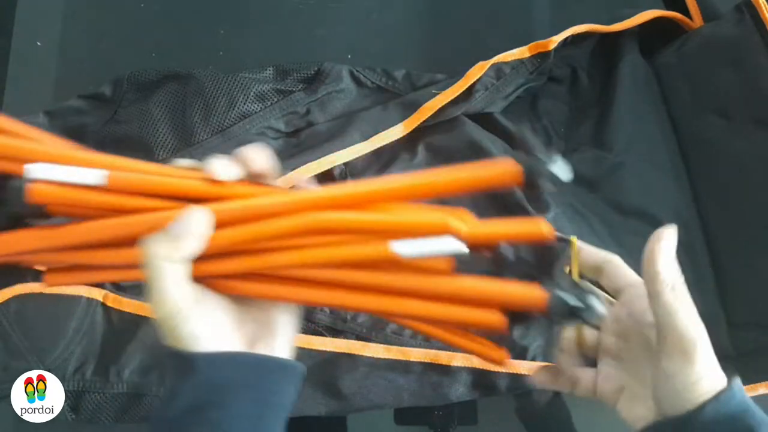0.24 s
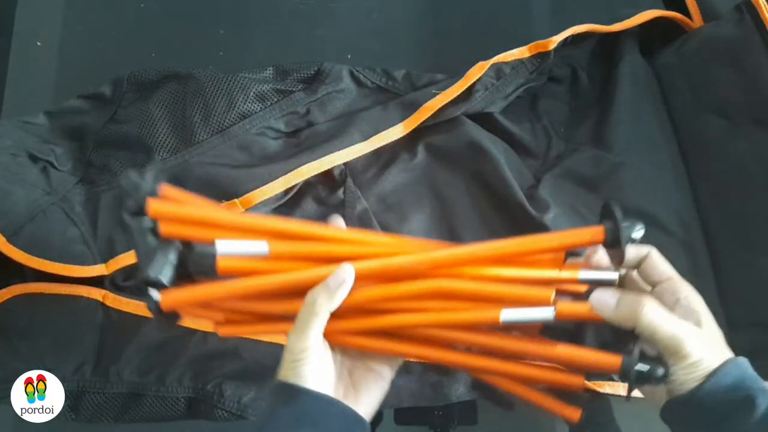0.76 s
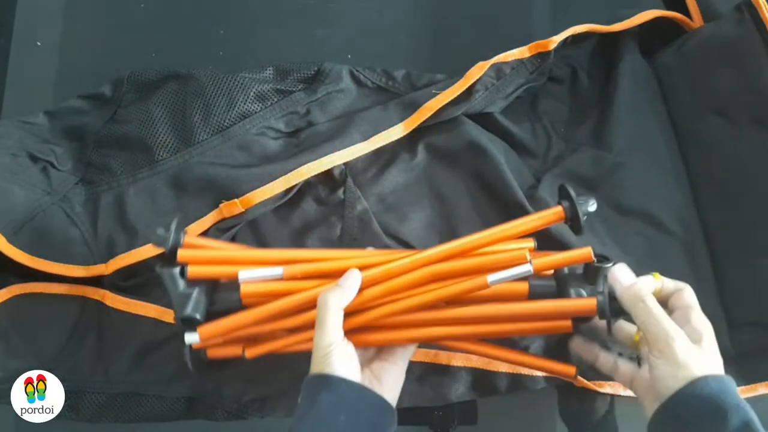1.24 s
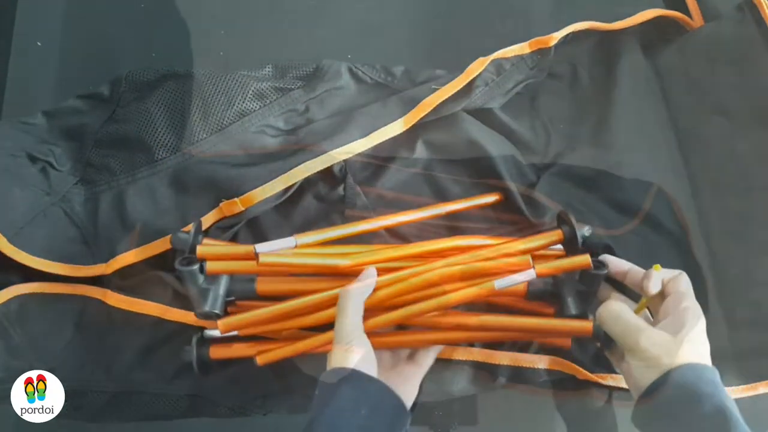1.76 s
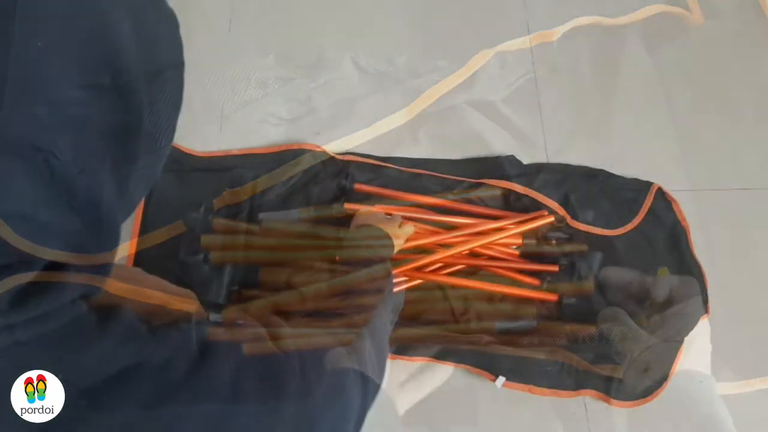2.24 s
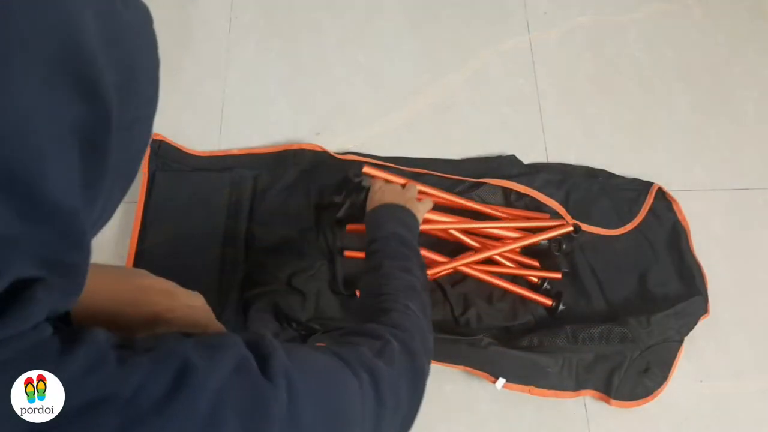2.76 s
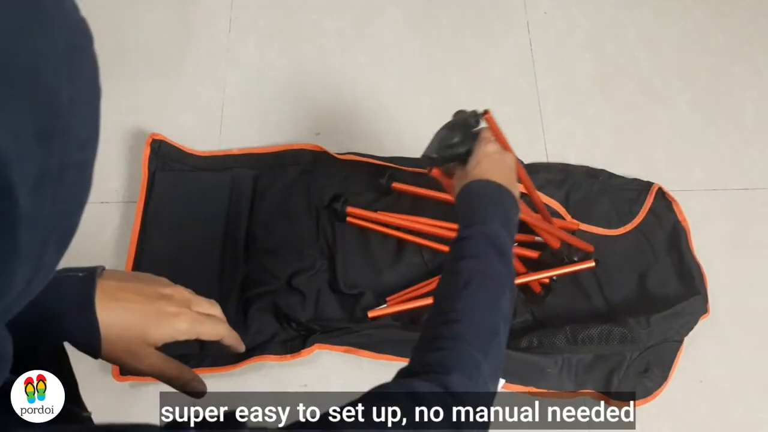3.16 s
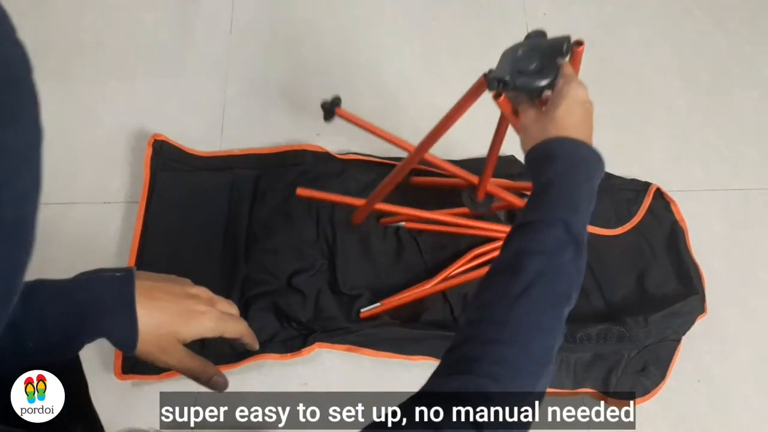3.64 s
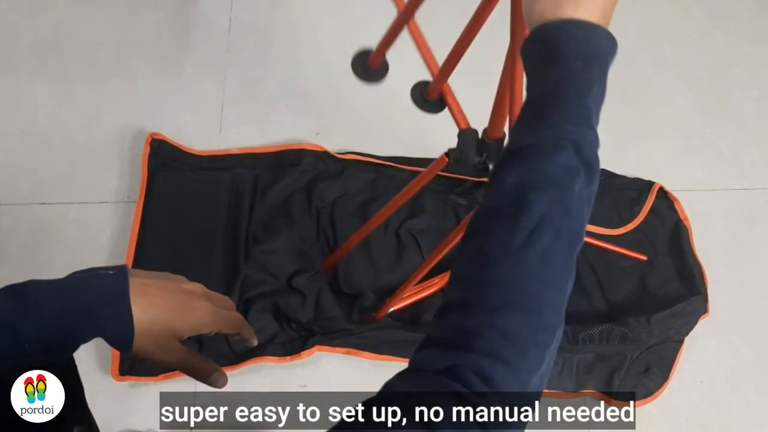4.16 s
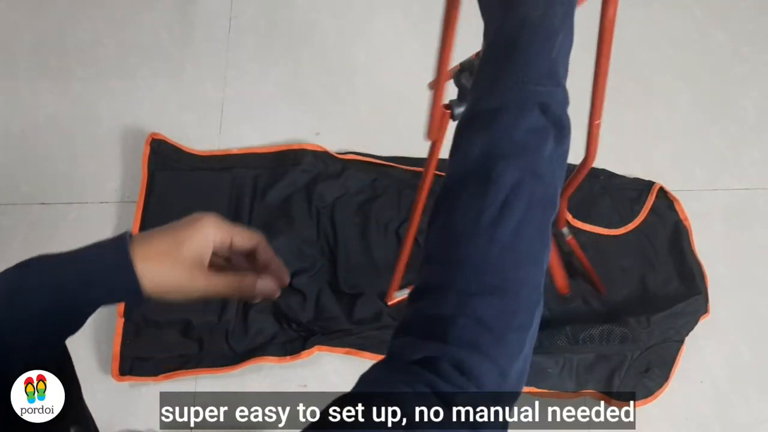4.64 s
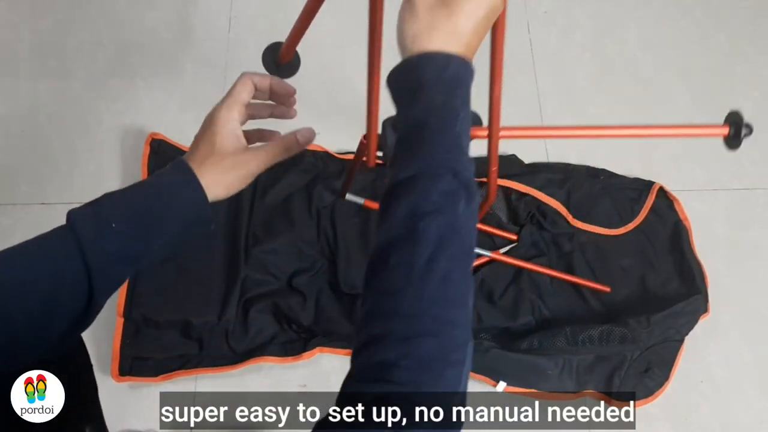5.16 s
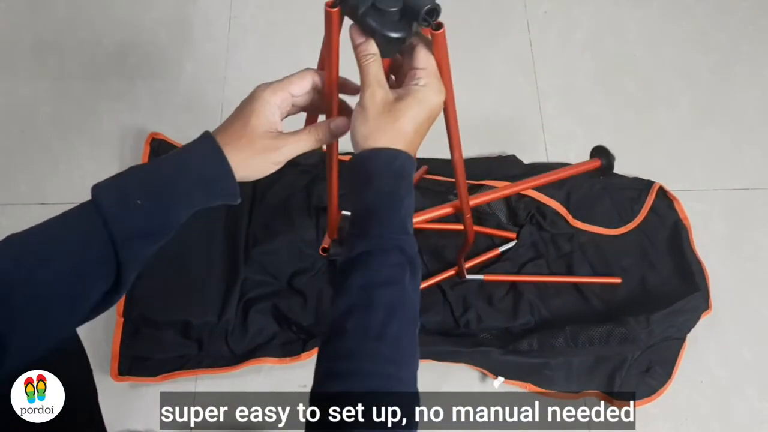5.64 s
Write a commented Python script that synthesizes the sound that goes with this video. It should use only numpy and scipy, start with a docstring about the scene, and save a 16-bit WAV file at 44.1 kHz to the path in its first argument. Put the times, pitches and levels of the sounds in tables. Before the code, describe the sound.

A bundle of thin metal tent-style poles clacks and clinks sharply in the hands over rustling nylon in a bare, bright tiled room.

```python
"""Hands shift a bundle of thin aluminium chair poles over a nylon seat in a bare, tiled room, a phone close above.
Faint clacks come first over hum and hiss; then the nylon rustles and a pole slides on another.
Poles clack harder on each other and on plastic hubs: noise cracks with a knock, then damped tube modes ring.
Midway the bundle thuds down on low room modes and tubes and hubs tock hollowly; late comes a bright, ringing cluster.
A few lighter clacks and creases end it; decaying noise gives the room's bright half-second tail throughout."""
import sys
import numpy as np
from scipy import signal
from scipy.fft import rfft, irfft, next_fast_len
from scipy.io import wavfile
from scipy.ndimage import map_coordinates

SR = 44100
rng = np.random.default_rng(int(sys.argv[2]) if len(sys.argv) > 2 else 0)


def unload_wav(signal):
    """Save mono or channel-first audio to the path in sys.argv[1] as 16-bit WAV at rate SR, clipped to [-1, 1]."""
    wavfile.write(
        sys.argv[1],
        SR,
        np.round(np.clip(np.atleast_2d(signal).T, -1, 1) * 32767).astype(np.int16),
    )


N = 260631

# poles hitting poles and hubs: start_s, crack_peak_db, knock_hz, body_db, treble_db, tube_ring_db, contact_ms
POLE_CLACKS = [ (.172, -53.5, 2500, -5, -19, -21.5, 2.7), (0.42, -50, 2430, -9.5, -8, -25, 4.1),
               (.69, -41, 2080, 3, -38, -19, 3.4), (0.715, -45, 2030, -11, -26, -33, 1.6),
               (.78, -28, 2100, -18, -16, -23.5, 6.2), (.822, -30, 2030, 5, -38, -32, 1.7),
               (.867, -33.5, 2360, 2, -49, -28, 1.9), (.918, -15.5, 1484, -8.5, -12, -48, 2.27),
               (1.053, -31, 2960, -9, -29, -39, 2.3), (1.083, -15, 5630, -7, -12.5, -19, 3.2),
               (1.168, -25.5, 2360, -1.5, -46, -27, 2.1), (1.255, -24.5, 3350, -12, -19, -53, 1.6),
               (1.411, -36, 2350, -7, -29, -25, 4.1), (1.468, -33, 2350, 1, -17, -30, 3.8),
               (1.49, -28.5, 3160, -4, -12, -20, 4.9), (1.532, -25, 3780, -20, -35, -23, 6.2),
               (1.589, -9, 4060, -28, -8, -23, 4), (1.811, -20, 7100, 1, -15, -37, 4.1),
               (1.818, -19, 7130, -2.5, -25, -20, 3), (1.91, -19, 3750, -7, -27, -18.5, 1.4),
               (1.961, -16.5, 3020, -4.5, -13, -24.5, 3.9), (2.025, -23, 7140, -3, -12, -34, 2.6),
               (2.031, -6.5, 7130, -7.5, -3.5, -32.5, 3.3), (2.107, -13, 2850, -3.5, -8.5, -26, 2.4),
               (2.227, -14.5, 4000, -10.5, -10.5, -26.5, 1.6), (2.28, -18.5, 1340, 11.5, -7, -45, 0.85),
               (2.549, -31.5, 7420, -17, -1, -19.5, 3.1), (2.575, -8.5, 11800, -2, -4.5, -23.5, 2.15),
               (2.652, -22, 3310, -5.5, -21, -20.5, 3.1), (2.731, -21, 2230, -15, -20, -29, 3.9),
               (2.745, -17.5, 4910, -18, -8.5, -17.5, 3.2), (3.109, -27.5, 3326, -10, -47, -22, 5),
               (3.125, -28.5, 2340, -5, -23, -41, 8.1), (3.205, -13, 3364, -5, -6.5, -21.5, 1.56),
               (3.292, -23.5, 2630, -6, -54, -30, 1.5), (3.436, -27.5, 1810, -0.5, -24, -29, 6),
               (3.653, -20.5, 1630, 7, -22.5, -28, 4.4), (3.861, -10, 1927, 4, -7.5, -41, 2.7),
               (4.09, -25, 3690, -10, -9, -22, 6.6), (4.462, -28, 7200, -16, -22.5, -29, 4.9),
               (4.468, -18, 7160, -19, -8.5, -26, 9.3), (4.477, -23, 4100, 2, 3, -39, 5.5),
               (4.626, -28, 7160, -9, -0.5, -20, 14.3), (4.65, -10.5, 5020, -21.5, 1, -15, 8.6),
               (4.662, -20, 5550, -20, 3, -21.5, 1.6), (4.672, -16.5, 5300, -22, 15, -24.5, 5.4),
               (4.682, -16, 5060, -27, 2, -18, 7.2), (5.119, -48.5, 2160, 3, -10.5, -21.5, 2.5),
               (5.22, -31, 2200, -2, -53, -28, 3.1), (5.437, -24.5, 4300, 0, -5, -27, 3.9),
               (5.554, -37.5, 2900, 9, -8, -23.5, 5.9), (5.592, -35.5, 2950, 2, -9.5, -26, 3),
               (5.753, -35, 1590, 1.5, -18.5, -40, 6)]
# wall modes of a tube, before each blow's own scaling: pitch_hz, level_db, t60_s
TUBE_MODES = [(3036, -11, .1), (3833, -9, .05), (5040, -7, .07), (5120, -7, .07), (5218, -7, .08),
              (7154, -5, .06), (7312, 1, .13), (7625, -8, .06), (8233, -6, .06), (9903, -8, .06),
              (10050, -8, .05), (12610, -8, .05), (12690, -8, .06)]
# hollow tocks of tubes and hubs: start_s, level_db, pitch_hz
HOLLOW_TOCKS = [(1.711, -27, 1000), (2.035, -26, 700), (2.107, -26, 560), (2.581, -23, 1320),
                (2.59, -29, 873), (3.657, -38, 243), (3.872, -38, 253), (4.256, -40, 698),
                (5.122, -51, 684), (5.479, -33, 896), (5.564, -55, 330), (5.6, -46, 432),
                (5.628, -45.5, 288)]
# a pole sliding along another: start_s, end_s, level_db, pitch_hz, width (share of the pitch)
POLE_SLIDES = [(0.62, 0.74, -61.5, 2100, 0.083), (1.369, 1.628, -49.5, 820, 0.47),
               (2.761, 3.027, -44, 3260, 0.081), (3.702, 3.899, -49, 1430, 0.15),
               (3.954, 3.994, -39.5, 1064, 0.04), (4.12, 4.228, -55, 850, 0.17),
               (5.29, 5.418, -51.5, 760, 0.63)]
# nylon dragged and creased: time_s, level_db, tilt_db_per_octave
NYLON_MOVES = [(.55, -82, 0.5), (.72, -56.5, 1), (.78, -49.5, -2.5), (.89, -74, -4), (1.03, -69, -5.5),
               (1.36, -78, -9.5), (1.43, -61, -5.5), (1.53, -37, 1), (1.68, -41, -5.5), (1.8, -46, -3),
               (2.3, -45.5, -2.5), (2.48, -47, -2.5), (2.78, -41, 0.5), (2.95, -41, 0.5), (3.08, -48.5, -2),
               (3.2, -45.5, -1.5), (3.63, -56, -2), (3.8, -50.5, -0.5), (4.19, -54, -2.5),
               (4.31, -94.5, -11.5), (5.05, -85, -8.5), (5.28, -61, -1), (5.36, -52, 1.5),
               (5.48, -60.5, -5), (5.62, -64.5, -4), (5.72, -77.5, -8), (5.91, -84, -8.5)]
# spectrum of the nylon: pitch_hz, density_db (per Hz)
NYLON_SPECTRUM = [(60, -31), (150, -14), (400, -0.5), (1000, 6), (2200, 8.5), (3500, 6.5), (5500, 0),
                  (7500, 5.5), (9500, -3), (15000, -8.5)]
# bundle and hubs landing softly: start_s, peak_db
SOFT_THUDS = [(1.617, -41), (1.687, -38), (1.76, -37), (1.918, -38), (2.04, -43.5), (2.282, -31.5),
              (2.331, -36), (2.431, -45), (2.577, -37.5)]
# low room modes set going by the thuds: pitch_hz, level_db, t60_s
LOW_ROOM_MODES = [(66.2, -5, 0.072), (128, -3, 0.1), (186, -5.5, 0.06), (253.6, -1, 0.092), (345, 2, 0.052)]
# where the hands are: time_s, left_lag_ms (behind right), pan_db (left minus right)
HAND_PLACE = [(0.2, -0.059, 5), (1.2, -0.028, 2.5), (2.2, -0.036, 2.5), (3, 0.037, 2.2), (3.7, 0.036, 2.5),
              (4.5, 0.16, 1.5), (5.2, 0.041, 2)]
# decay of the room's tail: pitch_hz, t60_s
TAIL_T60 = [(60, 0.068), (200, 0.53), (600, 0.26), (1500, 0.47), (4000, 0.4), (10000, 0.44), (16000, 0.29)]
# colour of the room's tail: pitch_hz, level_db
TAIL_COLOUR = [(60, -23.5), (300, 0), (2000, -1.5), (8000, -3), (16000, 0)]
# how alike left and right are in the room: pitch_hz, correlation (0 to 1)
STEREO_LIKENESS = [(100, 0.6), (300, 0.79), (600, 0.25), (1200, 0.082), (16000, .02)]
# spectrum of the hiss: pitch_hz, density_db (per Hz)
HISS_SPECTRUM = [(80, -14.5), (120, 5.5), (160, -13.5), (249, 0), (343, -8), (818, -16), (2800, -32),
                 (3620, -41.5), (5080, -34.5), (6420, -8.5), (9210, -33), (16000, -42.5)]
# spectrum of the low hum: pitch_hz, density_db (per Hz)
HUM_SPECTRUM = [(20, -28.5), (45, -3), (69, -5.5), (78, 6), (88, -3), (130, -30.5)]
# background over time: time_s, hiss_db, hum_db (middle of left and right)
BACKGROUND_LEVEL = [(0, -69, -71.5), (1.2, -64.5, -68), (1.6, -121, -68), (2.8, -77.5, -69),
                    (4.4, -69, -80), (5.9, -97.5, -79)]

ROOM_SHARE_DB, SHARE_DB_PER_MS = -15.5, 0.4  # longer contacts send more to the room
THIN_HZ = 340  # a slender pole moves little air below this
KNOCK_GAIN, KNOCK_WIDTH = 1.7, 0.072  # height of the knock over the crack, width as a share of its pitch
UNEVEN_DB, UNEVEN_HZ = 3., 400.  # each contact has its own peaks and dips: depth, spacing
RATTLES, RATTLE_HZ, RATTLE_MS = 150, 2546, 0.8  # count, middle pitch, contact time
RATTLE_DB, RATTLE_SPREAD_DB = 10.5, 3.5  # over the cloth level, spread
PATCHY_DB, PATCHES_PER_S = 3, 20.  # how unevenly the folds colour the rustle
TOP_HZ = 15700  # upper limit of the phone


def undb(db):
    """Turns dB into a gain."""
    return 10 ** (np.asarray(db) / 20)


def unit(x):
    """Scales to an RMS of one."""
    return x / np.sqrt(np.mean(x ** 2))


def on_log(table, hz):
    """Reads a (Hz, value) table on a log-frequency axis."""
    f, v = np.transpose(table)
    return np.interp(np.log(np.maximum(hz, 1)), np.log(f), v)


def curves(table):
    """Draws straight lines between the rows of a timed table, one curve a column."""
    s, *columns = np.transpose(table)
    return [np.interp(np.arange(N) / SR, s, c) for c in columns]


def colour(x, gain):
    """Filters by a gain given as a function of Hz."""
    n = next_fast_len(x.shape[-1])
    return irfft(rfft(x, n) * gain(np.fft.rfftfreq(n, 1 / SR)), n)[..., :x.shape[-1]]


def ring(modes, length, spread_db, detune):
    """Damped sines; each blow weights and bends them a little differently."""
    hz, db, t60 = np.transpose(modes)[:, :, None]
    bend, weight = rng.standard_normal((2, len(modes), 1))
    t = np.arange(length) / SR
    waves = np.sin(2 * np.pi * hz * (1 + detune * bend) * t)
    waves = waves * np.exp(-np.log(1000) * t / t60)
    return np.sum(undb(db + spread_db * weight) * waves, axis=0)


def add(out, x, s):
    """Lays a sound into the track at s seconds."""
    i = int(s * SR)
    out[i:i + len(x)] += x[:N - i]


def pair(size, likeness):
    """Two noises whose likeness depends on frequency."""
    mid, side = rng.standard_normal((2, size))
    alike = lambda hz: np.clip(on_log(likeness, hz), 0, 1)
    mid = colour(mid, lambda hz: np.sqrt(1 + alike(hz)))
    side = colour(side, lambda hz: np.sqrt(1 - alike(hz)))
    return np.array([mid + side, mid - side]) / np.sqrt(2)


def patches():
    """A random curve for the uneven folds of the cloth."""
    return np.interp(np.arange(N) / SR * PATCHES_PER_S, np.arange(200), rng.standard_normal(200))


def contact_gain(shape, hz):
    """Spectrum of one contact: body and treble, a broad knock, chance peaks and dips, thin bass."""
    uneven = UNEVEN_DB * rng.standard_normal(80)

    def gain(f, share=1):  # share scales the knock and the unevenness
        bumps_db = share * np.interp(f / UNEVEN_HZ, np.arange(80), uneven)
        knock = 1 + share * KNOCK_GAIN / (1 + ((f - hz) / (KNOCK_WIDTH * hz)) ** 2)
        thin = 1 + (THIN_HZ / (f + 1)) ** 3
        return undb(on_log(shape, f) + bumps_db) * knock / thin
    return gain


def tube_ring(shape, hz, ring_db, length):
    """The tube's walls ring after a blow, longer and truer in pitch the looser the pole is held."""
    # a pole held loosely rings both louder and longer
    free = min(undb(.6 * (ring_db + 13)), 1.1)
    # poles differ in width: a knock near a main wall mode tells how far all modes shift
    shift = min(hz / np.array(TUBE_MODES)[[0, 3, 6], 0], key=lambda r: abs(r - 1))
    if abs(shift - 1) >= .1:
        shift = 1 + .06 * rng.standard_normal()
    # the freer the pole, the truer its pitch
    shift = 1 + (shift - 1) * min(4 * (1.1 - free) ** 3, 1)
    # the crack drives each mode by its own strength there
    modes = [(f * shift, d + on_log(shape, f), t60 * free) for f, d, t60 in TUBE_MODES]
    # no tube is quite round: every mode is a close pair; a gripped pole is bent out of tune
    detune = .002 + .03 * max(1 - free, 0) ** 2
    return undb(ring_db) * ring(modes + modes, length, spread_db=2.5, detune=detune)


def clacks():
    """A crack of a few ms with a broad knock in it, then the tube's ring; returns direct and room parts."""
    near, far, t = np.zeros(N), np.zeros(N), np.arange(8192) / SR
    for s, db, hz, body_db, treble_db, ring_db, contact_ms in POLE_CLACKS + rattles():
        room_db = ROOM_SHARE_DB + SHARE_DB_PER_MS * contact_ms
        shape = [(100, body_db - 15.5), (700, body_db), (2000, 0.074 * body_db), (4000, -.1 * body_db),
                 (7800, 0.31 * treble_db), (9500, 0.61 * treble_db),
                 (13000, treble_db), (16000, 0.41 * treble_db - 15.0)]
        gain = contact_gain(shape, hz)
        contact_ms = max(contact_ms, .3)
        # a glancing contact scrapes: it starts softer and lasts longer
        x = t / (contact_ms / 1000)
        burst = rng.standard_normal(len(t)) * np.exp(-x) * (1 - np.exp(-8 * x))
        crack = colour(burst, gain)
        crack /= np.abs(crack).max()
        # summed over all directions the crack has a smoother spectrum
        spread = colour(1. * (np.arange(len(t)) == 64), lambda f: gain(f, share=.65))
        # energy grows with the contact time
        spread *= np.sqrt(4.78 * contact_ms / np.sum(spread ** 2))
        tube = tube_ring(shape, hz, ring_db, len(t))
        add(near, undb(db) * (crack + tube), s)
        add(far, undb(db + room_db) * (spread + tube), s)
    return near, far


def rattles():
    """Rows like those of the clacks, at chance moments and as strong as the cloth moves."""
    place = rng.random(RATTLES)
    size, pitch, bright = rng.standard_normal((3, RATTLES))
    s = place * (N / SR - .1)
    cloth_db = curves(NYLON_MOVES)[0][(s * SR).astype(int)]
    db = cloth_db + RATTLE_DB + RATTLE_SPREAD_DB * np.minimum(size, 1)
    hz = RATTLE_HZ * 2 ** (.55 * pitch)
    treble_db = -17. + 6 * np.clip(bright, -2, 1)
    same = np.ones(RATTLES)
    return list(zip(s, db, hz, -6. * same, treble_db, -26. * same, RATTLE_MS * same))


def tocks():
    """A hollow knock sounds as three short damped modes with a soft start."""
    out, t = np.zeros(N), np.arange(8192) / SR
    for s, db, hz in HOLLOW_TOCKS:
        modes = [(hz, 0, 0.013 + 11.0 / hz), (.8 * hz, -7, .018), (0.62 * hz, -10, .02)]
        tock = ring(modes, len(t), spread_db=2.0, detune=0.0057) * (1 - np.exp(-t * hz / 0.92))
        add(out, undb(db) * tock, s)
    return out


def scrapes():
    """Uneven stick-slip ticks into one resonance of the pole, narrow and squeaky or broad and rough."""
    out = np.zeros(N)
    for start, end, db, hz, width in POLE_SLIDES:
        n = int((end - start) * SR)
        grip = np.repeat(rng.gamma(4, size=n // 200 + 1), 200)[:n]
        ticks = (rng.random(n) < .03) * rng.standard_normal(n) * grip
        sound = colour(ticks, lambda f: 1 / (1 + ((f - hz) / (width * hz)) ** 2))
        # each slide swells and fades
        add(out, undb(db) * unit(sound) * np.hanning(n) ** 0.43, start)
    return out


def rustle():
    """Many tiny creases, a few much larger, over a hiss of sliding weave; its tilt changes with the fold."""
    db, tilt = curves(NYLON_MOVES)
    # about 600 creases a second, each a short decaying burst
    creases = (rng.random(N) < 600 / SR) * undb(3.2 * np.minimum(rng.exponential(size=N), 3.5))
    creases = signal.lfilter([1], [1, -.95], creases) * rng.standard_normal(N)
    weave = 0.4 * rng.standard_normal(N)
    grain = unit(colour(unit(creases) + weave, lambda f: undb(on_log(NYLON_SPECTRUM, f))))
    rubs_db = 1.6 * patches()
    out = 0
    for hz in 62.5 * 2. ** np.arange(0, 8.1, .5):  # half-octave bands
        band = lambda f: np.clip(1 - 2 * np.abs(np.log2(np.maximum(f, 1) / hz)), 0, 1)
        band_db = tilt * np.log2(hz / 2500) + PATCHY_DB * patches()
        out = out + colour(grain, band) * undb(band_db)
    return out * undb(db + rubs_db)


def thuds():
    """A soft push of air that sets the low room modes going."""
    out, t = np.zeros(N), np.arange(16384) / SR
    for s, db in SOFT_THUDS:
        boom = ring(LOW_ROOM_MODES + LOW_ROOM_MODES, len(t), spread_db=3.0, detune=0.11)
        boom = boom * (1 - np.exp(-t / 0.0041))
        add(out, undb(db) * boom / np.abs(boom).max(), s)
    return out


def room(x):
    """Dense echoes that set in after 3 ms and die at a rate of their own in each octave."""
    t = np.arange(int(.8 * SR)) / SR
    noise, tail = pair(len(t), STEREO_LIKENESS), 0
    for hz in 62.5 * 2. ** np.arange(9):
        octave = lambda f: np.clip(1 - np.abs(np.log2(np.maximum(f, 1) / hz)), 0, 1)
        decay = np.exp(-np.log(1000) * t / on_log(TAIL_T60, hz))
        tail = tail + undb(on_log(TAIL_COLOUR, hz)) * colour(noise, octave) * decay
    tail = tail * np.clip((t - .003) / 0.0009, 0, 1)
    tail = tail / np.sqrt(np.sum(tail[0] ** 2))
    return signal.fftconvolve(x[None], tail, axes=1)[:, :N]


def hush():
    """Shaped noise: a hiss that comes and goes and a low hum, stronger on the left, that fades late."""
    hiss_db, hum_db = curves(BACKGROUND_LEVEL)
    hiss = colour(pair(N, STEREO_LIKENESS), lambda f: undb(on_log(HISS_SPECTRUM, f)))
    hum = colour(pair(N, STEREO_LIKENESS), lambda f: undb(on_log(HUM_SPECTRUM, f)))
    return unit(hiss) * undb(hiss_db) + unit(hum) * undb(hum_db) * undb([[2.0], [-2.0]])


def scene():
    """Places the direct sounds by lag and level between the ears, and adds the room and background."""
    near, far = clacks()
    tock, cloth, slides, thud = tocks(), rustle(), scrapes(), thuds()
    lag_ms, pan_db = curves(HAND_PLACE)
    shift = lag_ms * SR / 2000  # half the lag on each side, in samples
    close = near + tock + cloth + slides
    direct = [map_coordinates(close, [np.arange(N) - side * shift], order=3) for side in (1, -1)]
    hits = far + undb(-22) * tock
    to_room = undb(17.0) * hits + undb(2.0) * cloth + .5 * slides + undb(-1.5) * thud
    wet = room(to_room) + thud
    return (direct + wet) * undb(np.array([pan_db, -pan_db]) / 2) + hush()


def record(dry):
    """The phone drops the deepest bass and cuts the top."""
    thin = signal.sosfilt(signal.butter(3, 40, "high", fs=SR, output="sos"), dry)
    return signal.sosfilt(signal.ellip(10, .2, 70, TOP_HZ, fs=SR, output="sos"), thin)


dry = scene()
out = record(dry)
unload_wav(out)
```